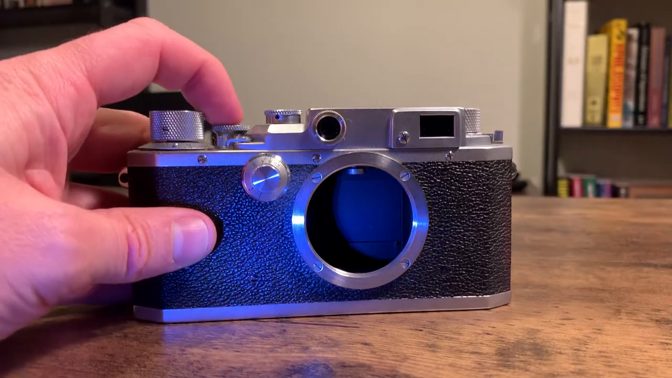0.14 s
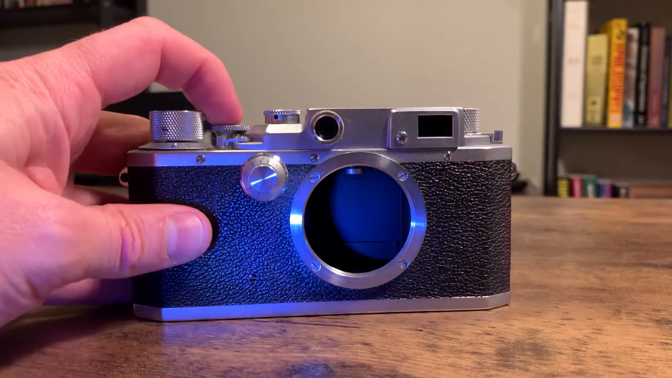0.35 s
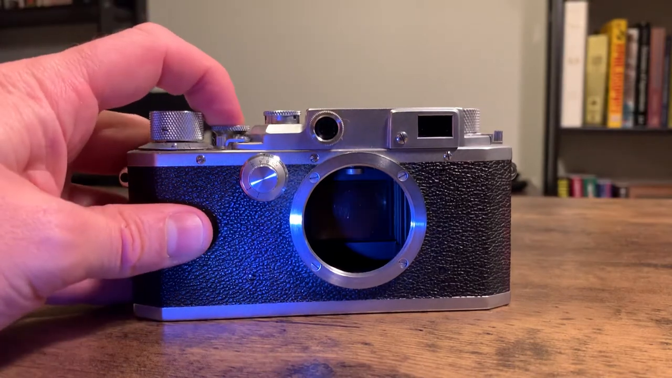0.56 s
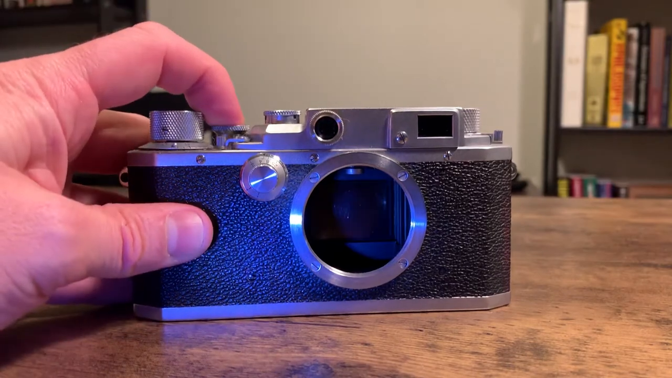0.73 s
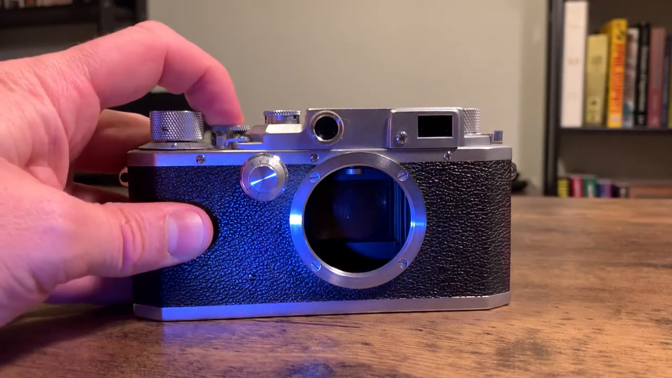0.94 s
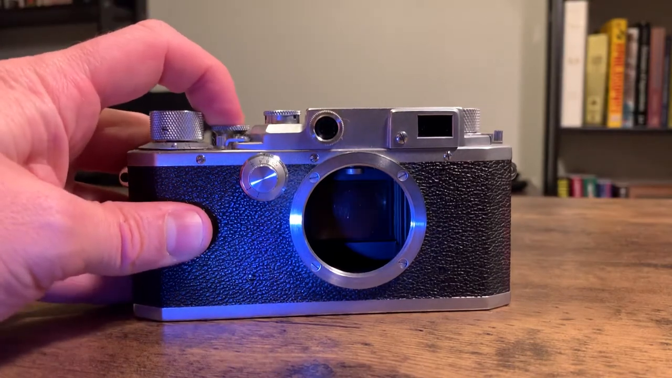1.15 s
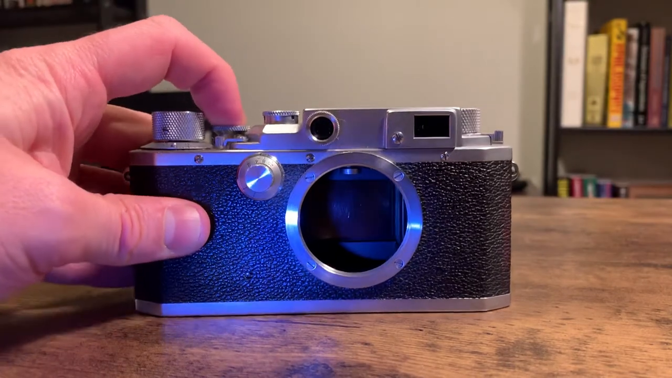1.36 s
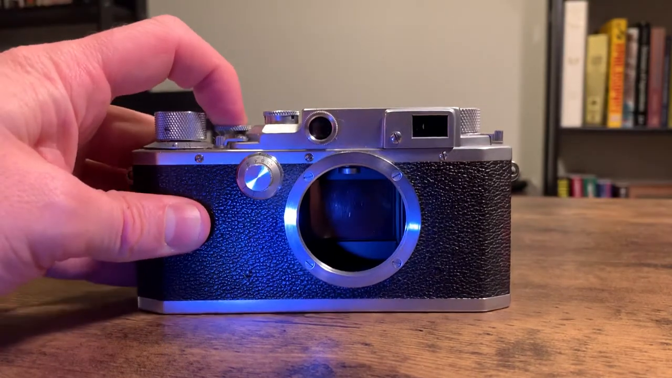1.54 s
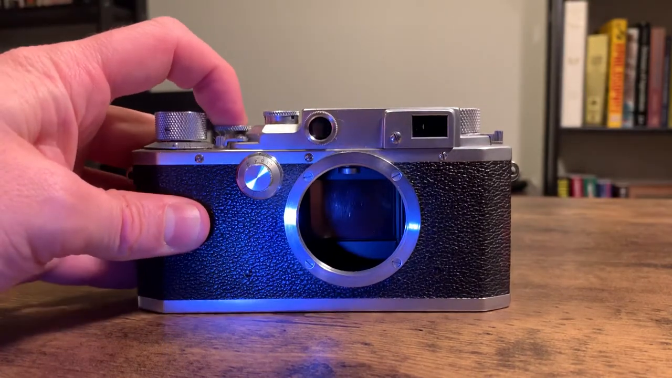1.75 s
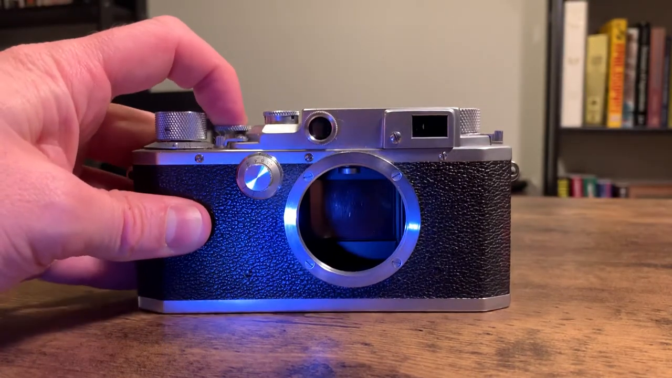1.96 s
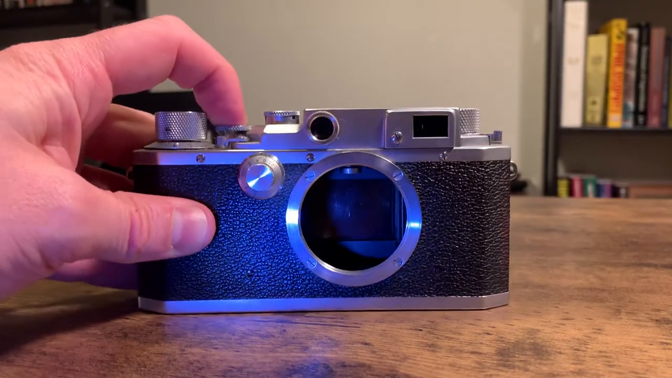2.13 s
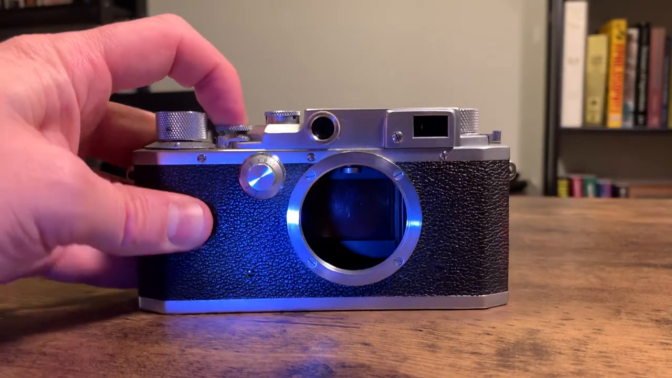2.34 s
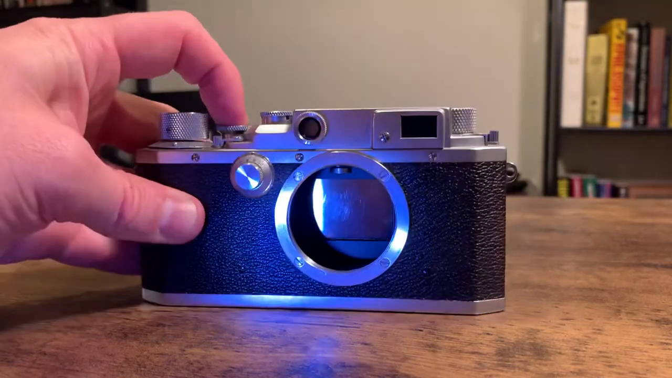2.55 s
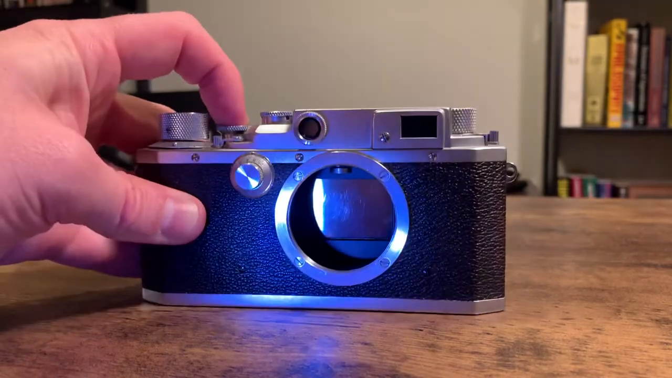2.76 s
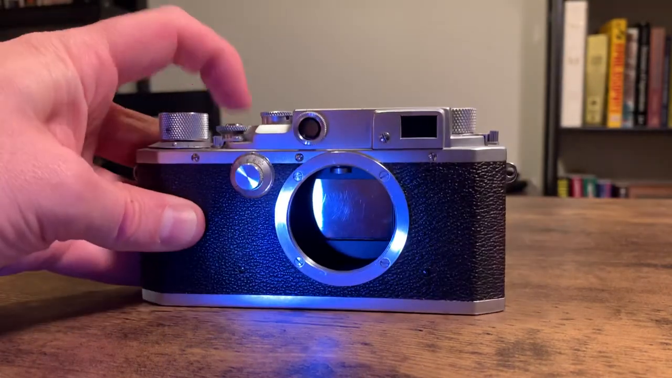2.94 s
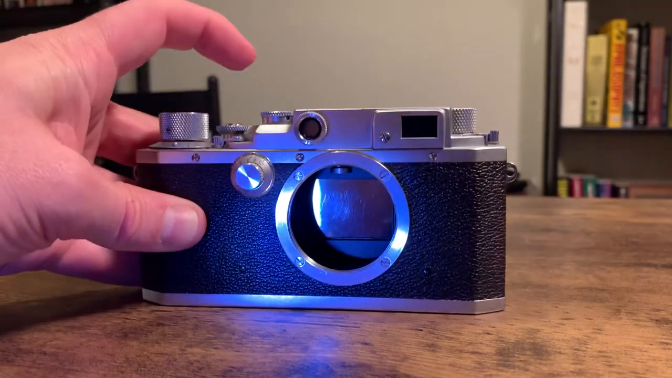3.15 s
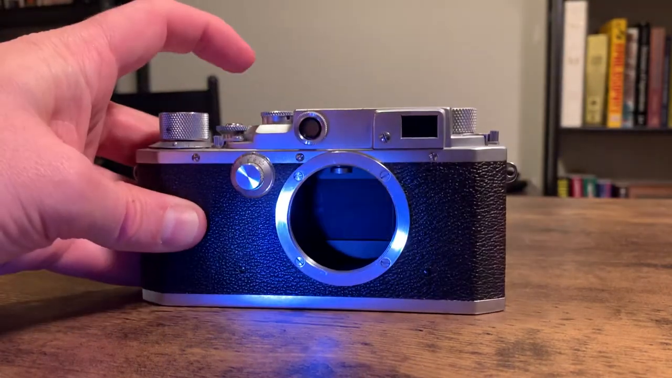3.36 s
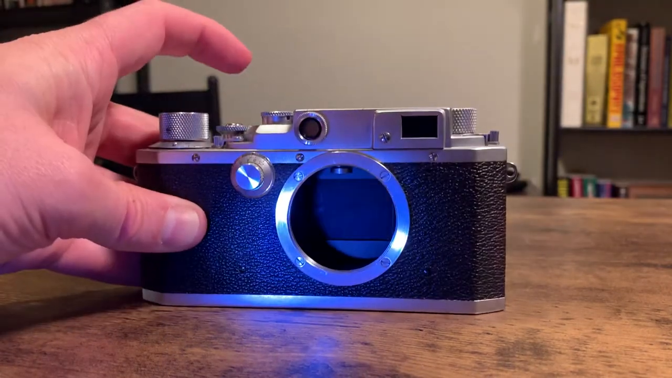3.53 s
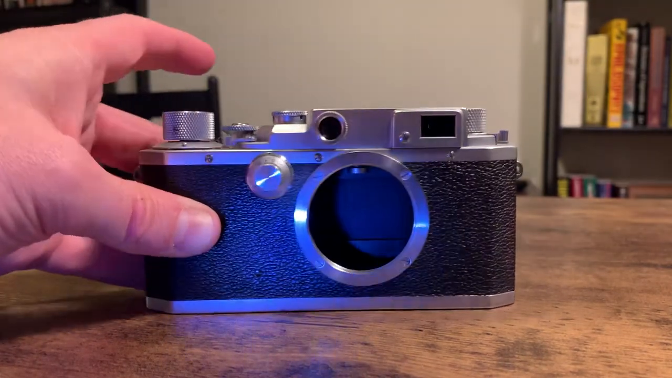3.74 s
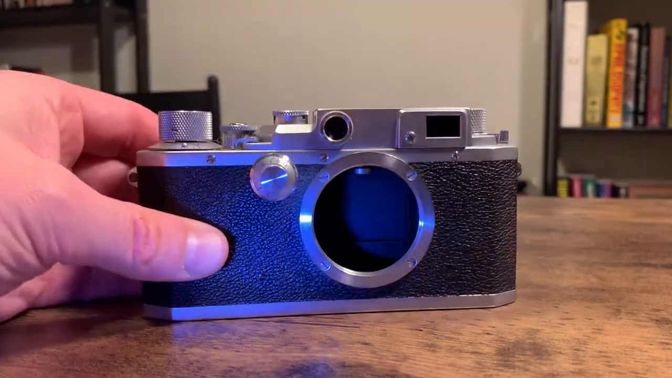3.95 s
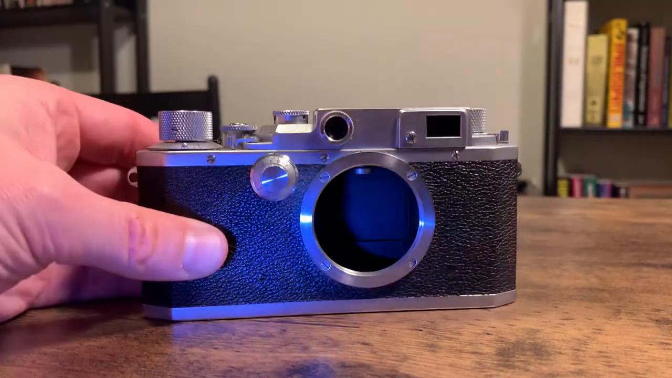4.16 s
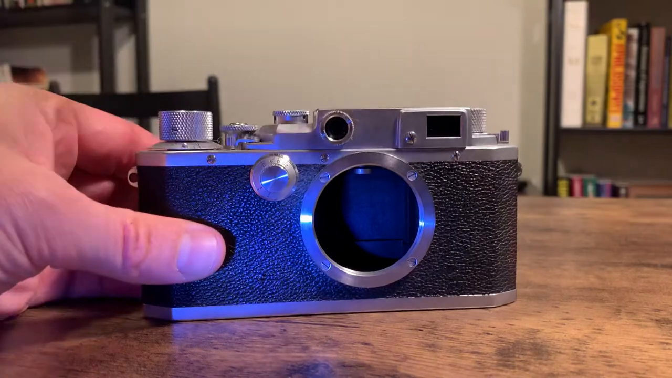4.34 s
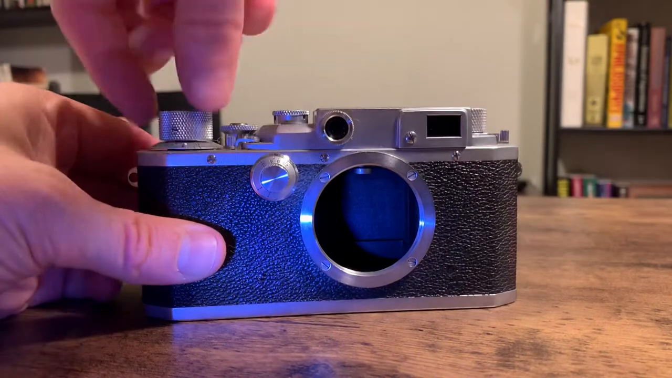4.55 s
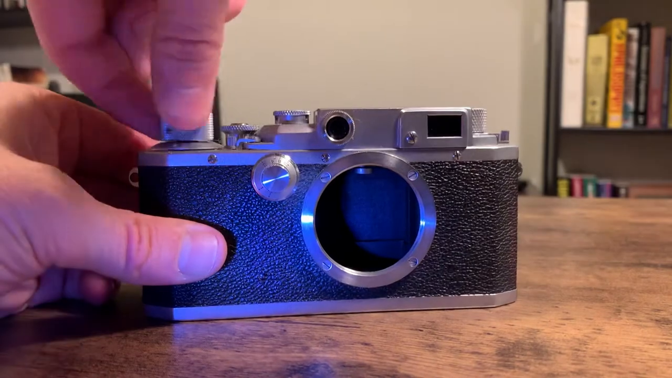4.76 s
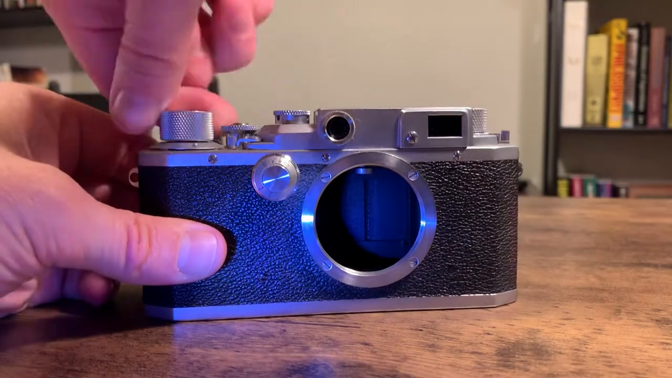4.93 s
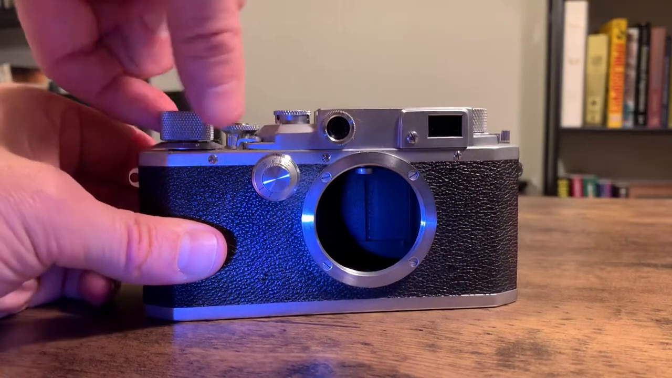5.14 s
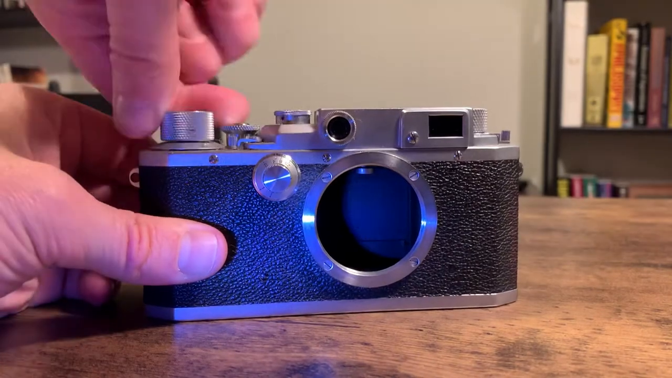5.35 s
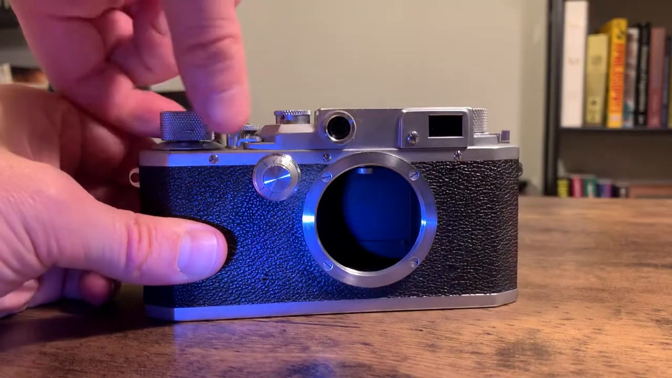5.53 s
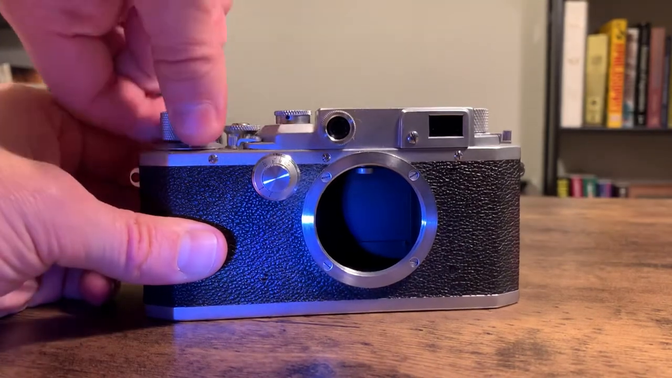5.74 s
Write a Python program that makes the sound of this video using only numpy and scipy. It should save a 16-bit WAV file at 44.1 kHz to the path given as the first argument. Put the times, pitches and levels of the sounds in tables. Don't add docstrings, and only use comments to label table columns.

```python
import sys
import numpy as np
from scipy import signal
from scipy.fft import rfft, irfft, next_fast_len
from scipy.io import wavfile
from scipy.ndimage import map_coordinates

SR = 44100
rng = np.random.default_rng(int(sys.argv[2]) if len(sys.argv) > 2 else 0)


def boost(x):
    u = np.asarray(x, float) / 20
    return 10 ** u


def bounce(signal):
    frames = np.transpose(np.atleast_2d(signal))
    limited = np.clip(frames, -1, 1)
    pcm = np.round(limited * 32767).astype(np.int16)
    wavfile.write(sys.argv[1], SR, pcm)


N = 255515
SPAN = 6144

# f/Hz, level/dB
AIR_SPECTRUM = [(20, -32), (33, -14), (50, -11.5), (85, -2.5), (130, -8.5), (260, -2), (500, -11.5),
                (900, -19), (1500, -23), (1900, -29.5), (2800, -47.5), (4200, -45.5), (8000, -48.5),
                (16000, -53)]
# f/Hz, width/Hz, level/dB
FAN_TONES = [(315, 31, -10.5), (380, 15, -8.5), (414.8, 15, -12.5), (516.7, 5, -14), (540, 15, -6),
             (1500, 36, -18.5), (2340, 90, -29), (2800, 90, -30), (3420, 65, -34.5), (15000, 100, -46.5)]
# f/Hz, level/dB, unsteadiness/dB, left leads by/radians, left minus right/dB
MOTOR_TONES = [(57.7, -52, 2, 0.74, -2), (167, -63.5, 4.5, 0.092, 1.5), (259.7, -58.5, 4.5, 0.71, -0.13)]
# f/Hz, width/Hz, level/dB
SHELL = [(1255, 410, -0.5), (3100, 870, -4), (4740, 330, -3), (6010, 400, -1.5), (7020, 770, -3.5),
         (8500, 1200, -4), (10400, 370, -1), (11860, 320, -1.5), (11900, 980, 1.5), (12400, 1100, -5.5),
         (13600, 690, -6.5), (15760, 600, 0)]
# f/Hz, level/dB, time to fall 60 dB/s
BODY_ON_WOOD = [(312, -4, 0.21), (480, -9.5, 0.039), (700, -8, .04), (1083, -6.5, 0.18),
                (1345, -11.5, 0.008)]
# t/s, peak level/dB, brightest f/Hz, thump level/dB, thump f/Hz
CATCH = [
    (.4167, -33, 5970, -52, 1200),
    (.4408, -11.5, 4450, -29, 480),
]
OPENING = [
    (.4366, -33, 7000, -46, 330),
    (.4425, -19, 5960, -28, 290),
    (.4635, -27, 12300, -38, 315),
    (.4797, -14, 15300, -34, 1300),
    (.4849, -3, 11200, -21, 1120),
    (.4872, -11, 5950, -17, 480),
    (.4975, -28, 12500, -25, 312),
]
# t/s, level/dB, body drone against it/dB
CURTAIN_RUNS = [
    [(.446, -43, 6), (.462, -42, 5), (.472, -35, -1), (.484, -32, -1)],
    [(.49, -32, 6), (.499, -41, 13), (.512, -52, 17)],
    [(3.158, -42, -6), (3.171, -44, -4), (3.177, -31, -12), (3.187, -25, -13), (3.202, -26, -10)],
]
# t of most force/s, rise/s, fall/s, level/dB, grit against it/dB
SHOVES = [(1.25, 0.15, 0.19, -48, -27), (2.116, 0.12, 0.043, -57.5, -8.5), (2.34, 0.16, 0.13, -43.5, -19),
          (3.615, .13, 0.2, -41.5, -20.5), (3.845, 0.052, 0.11, -42.5, -27),
          (4.775, 0.098, 0.16, -45.5, -11), (4.915, 0.035, 0.15, -50.5, -14.5),
          (5.19, 0.081, 0.13, -50, -9.5), (5.26, 0.088, 0.114, -45.5, -16),
          (5.364, 0.012, 0.043, -52.5, -17), (5.79, 0.015, .05, -43, -35)]
# f/Hz, level/dB
DRAG_SPECTRUM = [(80, 4.5), (200, -2), (420, 6.5), (650, 0), (1100, -10.5), (1700, -25.5), (3000, -46)]
# f/Hz, width/Hz, level/dB
TABLE_TOP = [(280.8, 30, -5.5), (479, 38, 5), (854, 18, -22), (1100, 57, -35), (1880, 30, -19)]
# f/Hz, level/dB
GRIT_SPECTRUM = [(1200, 5), (2200, 1.5), (4500, -15), (6700, -20.5), (11000, -25.5), (16000, -30.5)]
# t of most force/s, rise/s, fall/s, level/dB, hiss against it/dB
RUBS = [
    (2.1, 0.048, 0.047, -75, 10),
    (4.19, 0.25, 0.23, -67.5, -5.5),
    (4.3, 0.086, 0.18, -57.5, -22),
    (4.48, 0.12, 0.44, -66, -0.5),
    (4.785, 0.089, 0.11, -62.5, 5.5),
    (5.03, 0.22, 0.37, -64, -1.5),
    (5.23, .12, 0.094, -83, -5),
    (5.59, 0.071, 0.04, -65.5, 6.5),
]
# f/Hz, level/dB
SKIN_SPECTRUM = [(1500, 18), (2800, 14), (3300, 19.5), (3750, 19.5), (4300, 13), (4900, -23), (5300, -64),
                 (5900, -23), (6500, -36)]
# f/Hz, level/dB
HISS_SPECTRUM = [(4000, -5.5), (6500, -18.5), (10000, -15), (15000, -38), (16500, -21)]
# t/s, thump level/dB, thump f/Hz
KNOCKS = [
    (1.204, -45, 440),
    (2.253, -37.5, 920),
    (2.856, -32, 152),
    (3.579, -40, 500),
    (4.142, -34.5, 126),
    (4.902, -21, 1770),
    (4.907, -24.5, 1160),
    (5.365, -45, 500),
]
# t/s, peak level/dB, brightest f/Hz, thump level/dB, thump f/Hz
TICKS = [(1.928, -57.5, 4360, -34, 1750), (2.088, -46.5, 8600, -33, 1100), (2.094, -44, 15000, -67, 1200),
         (2.113, -45, 9730, -59, 540), (2.120, -51, 6600, -41, 1100), (4.140, -59, 10850, -52, 900),
         (4.487, -40.5, 3760, -47, 1880), (4.490, -38, 2010, -31, 465), (4.646, -40, 11900, -33, 475),
         (4.663, -39, 4120, -32.5, 444), (4.688, -38, 12530, -38, 1500), (4.763, -27, 3610, -46.5, 1900),
         (4.771, -30.5, 5770, -28, 430), (5.258, -48, 4380, -55, 436), (5.5675, -26, 14200, -30, 700),
         (5.5705, -26.5, 4900, -24.5, 480), (5.577, -43, 3000, -30.5, 257)]
# t/s, peak level/dB
SNAPS = [
    (4.2436, -42.5),
    (4.2720, -41),
    (4.3860, -47),
]
# t/s, peak level/dB, brightest f/Hz, thump level/dB, thump f/Hz
CLOSING = [
    (2.8105, -38, 5960, -50, 390),
    (2.8180, -40, 10500, -42, 900),
    (2.8225, -28, 12000, -46, 600),
    (2.8238, -16, 12000, -38, 700),
    (2.8275, -20, 9900, -32, 500),
    (2.8322, -26, 6000, -36, 400),
    (2.8400, -27, 6000, -36, 260),
    (2.8550, -36, 10300, -33, 280),
    (3.1620, -26, 10400, -44, 700),
    (3.1845, -19, 10300, -36, 650),
]
# t/s, teeth passed so far
TEETH = [
    (2.8312, 0),
    (2.849, 3),
    (2.9181, 14),
    (2.9882, 24),
    (3.0405, 32),
    (3.107, 44),
    (3.1631, 54),
]
# t/s, level/dB
GEAR_LEVEL = [
    (2.845, -48.5),
    (2.939, -50.5),
    (3.111, -48.5),
    (3.119, -51),
    (3.16, -41.5),
]
# t/s, peak level/dB, brightest f/Hz, thump level/dB, thump f/Hz
BRAKE = [
    (3.2027, -3.5, 14400, -21, 650),
    (3.2042, -11, 12400, -11, 560),
]
# t/s, f/Hz, level/dB
SQUEAK = [
    (4.879, 5500, -85.5),
    (5.0, 5650, -82),
    (5.151, 5850, -78),
    (5.219, 5950, -63.5),
    (5.3, 6100, -101),
]
# f/Hz, time to fall 60 dB/s
ECHO = [(200, 0.46), (1000, .33), (4000, .46), (10000, 0.24), (16000, 0.11)]
# f/Hz, likeness 0 to 1
NEAR_LIKENESS = [(60, .8), (500, .6), (1200, .45), (2500, .6), (5000, .6), (7500, .96), (15000, .98)]
# f/Hz, likeness 0 to 1
FAR_LIKENESS = [(60, .75), (300, .5), (1000, .2), (4000, .25), (7500, .94), (15000, .96)]
# f/Hz, phase/radians
LEFT_LEAD = [(0, 0), (600, 1), (1500, 1.6), (2400, 3), (4200, 0), (6300, 0), (8600, np.pi),
             (10900, 2 * np.pi), (13400, 3 * np.pi), (15700, 4 * np.pi), (17000, 4.5 * np.pi)]
# f/Hz, left minus right/dB
BALANCE = [(60, -2), (200, -1.5), (380, 1), (700, 0.5), (1290, 0), (2380, -0.5), (8120, -2), (15000, 1)]
# f/Hz, level/dB
MIC_RESPONSE = [(100, 0), (15500, 0), (16000, -20), (16800, -45)]


def unit(x):
    return x / np.sqrt(np.mean(x ** 2) + 1e-20)


def along(points, hz):
    f, v = np.transpose(points)
    return np.interp(np.log(hz + 1), np.log(f + 1), v)


def levels(tables, edge):
    t, total = np.arange(N) / SR, 0
    for rows in tables:
        s, *columns = np.transpose(rows)
        gate = np.clip(np.minimum(t - s[0], s[-1] - t) / edge + 0.5, 0, 1)
        total = total + gate * boost([np.interp(t, s, column) for column in columns])
    return total


def wobble(rate):
    knots = rng.standard_normal(int(N * rate / SR) + 4)
    return map_coordinates(knots, [np.arange(N) * rate / SR])


def hiss():
    return rng.standard_normal((2, N))


def filtered(x, response):
    m = next_fast_len(x.shape[-1] + SPAN)
    return irfft(rfft(x, m) * response(np.fft.rfftfreq(m, 1 / SR)), m)[..., :x.shape[-1]]


def noise(spectrum):
    return unit(filtered(hiss(), lambda hz: boost(along(spectrum, hz))))


def resonances(modes):
    def response(f):
        total = 0
        for k, (centre, width, db) in enumerate(modes):
            damping = 1j * f * width
            total = total + (-1) ** k * boost(db) * damping / (centre ** 2 - f ** 2 + damping)
        return total
    return response


def air():
    def narrow(hz):
        return sum(boost(db) / (1 + ((hz - centre) / width) ** 2) for centre, width, db in FAN_TONES)
    fan = unit(filtered(hiss(), narrow))
    return boost(-56 + 0.8 * wobble(3)) * noise(AIR_SPECTRUM) + boost(-62 + 1.7 * wobble(7.3)) * fan


def hum():
    t, side, total = np.arange(N) / SR, np.array([[0.5], [-0.5]]), 0
    for hz, db, sway_db, lead, balance_db in MOTOR_TONES:
        loudness = np.sqrt(2) * boost(db + sway_db * wobble(22) + side * balance_db)
        drift = (0.26 + 0.17 * sway_db) * wobble(8)
        total = total + loudness * np.sin(2 * np.pi * hz * t + drift + side * lead)
    return total


def contacts(rows, t60, wood_db, focus_db, wide, cycles, reach):
    out, t = np.zeros((2, N + SPAN)), np.arange(SPAN) / SR
    f = np.fft.rfftfreq(SPAN, 1 / SR)
    shell = resonances(SHELL)(f)
    for s, db, hz, thump_db, thump_hz in rows:
        rattle = rng.standard_normal((2, SPAN)) * boost(-60 * t / t60) * (1 - np.exp(-t / 0.0003))
        dull = 1 / (1 + 1j * f / (reach * hz)) ** 2
        own_pitch = boost(focus_db) * resonances([(hz, wide * hz, 0)])(f) ** 2
        ring = irfft(rfft(rattle) * (dull * shell + own_pitch), SPAN)
        thump = boost(-60 * t * thump_hz / cycles) * np.sin(2 * np.pi * thump_hz * t)
        for tone_hz, tone_db, life in BODY_ON_WOOD:
            luck_db = rng.normal(0, 2, (2, 1))
            fall = boost(wood_db + tone_db + luck_db - 60 * t / life)
            thump = thump + fall * np.sin(2 * np.pi * tone_hz * t)
        thump = thump * (1 - np.exp(-t / 0.00063)) * (1 - t / t[-1])
        start = round(s * SR)
        out[:, start:start + SPAN] += boost(db) * ring / abs(ring[0]).max() + boost(thump_db) * thump
    return out[:, :N]


def shutter():
    steel = dict(cycles=11, reach=9)
    first = contacts(OPENING, t60=0.012, wood_db=-8, focus_db=3, wide=0.08, **steel)
    second = contacts(CLOSING, t60=0.0135, wood_db=-20, focus_db=3, wide=0.14, **steel)
    catch = contacts(CATCH, t60=0.007, wood_db=-12, focus_db=13, wide=0.07, **steel)
    brake = contacts(BRAKE, t60=0.01, wood_db=-22, focus_db=13, wide=0.13, **steel)
    return first + second + catch + brake + escapement() + curtains()


def curtains():
    gain, drone_gain = levels(CURTAIN_RUNS, edge=0.002)

    def thin(hz):
        return resonances(SHELL)(hz) * boost(along([(1300, -9.5), (4000, -3.5)], hz))
    rush = unit(filtered(hiss() * boost(1.5 * wobble(700)), thin))
    body = resonances([(hz, 5 / t60, db) for hz, db, t60 in BODY_ON_WOOD])
    drone = unit(filtered(hiss(), body))
    return gain * rush + gain * drone_gain * drone


def strokes(rows):
    fade_db, roundness = 39.5, 1.59
    t, total = np.arange(0, N / SR + 0.002, 0.001), 0
    for s, rise, fall, db, second_db in rows:
        away = np.maximum((s - t) / abs(rise), (t - s) / abs(fall))
        total = total + boost(db - fade_db * away ** roundness) * boost([[0], [second_db]])
    return [np.interp(np.arange(N) / SR, t, gain) for gain in total]


def hands():
    base_gain, grit_gain = strokes(SHOVES)
    skin_gain, hiss_gain = strokes(RUBS)

    def wood(hz):
        return boost(along(DRAG_SPECTRUM, hz)) * (boost(-6.5) + resonances(TABLE_TOP)(hz))
    boom = base_gain * boost(1.5) * unit(filtered(hiss(), wood))
    grit = grit_gain * boost(7 + 1.1 * wobble(300)) * noise(GRIT_SPECTRUM)
    drag = boost(2.6 * wobble(45)) * (boom + grit)
    skin = skin_gain * boost(2.8 * wobble(150)) * noise(SKIN_SPECTRUM)
    return drag + skin + hiss_gain * noise(HISS_SPECTRUM)


def fingers():
    knocks = [(s, db - 35.5, 3940, db, hz) for s, db, hz in KNOCKS]
    slips = SNAPS + [(4.279 + 0.0072 * k, -49.5) for k in range(10)]
    snaps = []
    for s, db in slips:
        pitch_luck, time_luck, level_luck = rng.standard_normal(3)
        hz = 3950 * (1 + 0.037 * pitch_luck)
        snaps.append((s + 0.00044 * time_luck, db + 2.5 * level_luck, hz, db - 17, 1900))
    return (contacts(knocks, t60=0.021, wood_db=-21, focus_db=-6, wide=0.21, cycles=7, reach=2)
            + contacts(TICKS, t60=0.022, wood_db=-18, focus_db=4, wide=0.21, cycles=6, reach=2.66)
            + contacts(snaps, t60=0.011, wood_db=-20, focus_db=32, wide=0.25, cycles=8, reach=0.5))


def escapement():
    s, teeth = np.transpose(TEETH)
    count = int(teeth[-1])
    time_luck, level_luck = rng.standard_normal((2, count))
    times = np.interp(np.arange(count), teeth, s) + 0.0004 * time_luck - 0.001
    strikes = np.zeros(N)
    strikes[np.round(times * SR).astype(int)] = boost(1.8 * level_luck)
    t = np.arange(SR // 50) / SR
    decay = boost(-60 * t / 0.012) * (1 - np.exp(-t / 0.0005))
    beat = signal.fftconvolve(strikes, decay)[:N] + boost(-24)

    def small_parts(hz):
        tone = [(2600, -30.5), (5000, 1.5), (7000, 3), (10000, 6.5)]
        return resonances(SHELL)(hz) * boost(along(tone, hz))
    buzz = filtered(beat * hiss(), small_parts)
    gain = levels([GEAR_LEVEL], edge=0.004)
    buzz = buzz / np.sqrt(np.mean(buzz[:, gain[0] > 0] ** 2))
    whirr = noise([(600, -54), (1050, -3.5), (1500, -0.5), (2100, -5), (2650, -9.5), (3300, -8),
                   (6000, -3), (7500, -20.5)])
    return gain * (boost(6) * buzz + boost(-4.5) * whirr)


def squeak():
    s, hz, db = np.transpose(SQUEAK)
    t = np.arange(N) / SR
    phase = 2 * np.pi * np.cumsum(np.interp(t, s, hz) + 170 * wobble(450)) / SR
    level_db = np.interp(t, s, db, left=-150, right=-150) + 1.4 * wobble(80)
    return boost(level_db) * np.sin(phase) * [[1], [0.6]]


def room(x):
    hz, t, z = signal.stft(rng.standard_normal((2, SR // 2)), SR, nperseg=256)
    dying = z * boost(-60 * t / along(ECHO, hz)[:, None])
    tail = signal.istft(dying, SR, nperseg=256)[1]
    late = np.pad(x, ((0, 0), (220, 0)))
    return signal.fftconvolve(late, tail / np.linalg.norm(tail[0]), axes=1)[:, :N]


def ports(pair, likeness):
    def share(hz):
        angle = np.arccos(np.clip(along(likeness, hz), -1, 1)) / 2
        return np.array([np.cos(angle), np.sin(angle)])

    def skew(hz):
        left = np.exp(0.5j * np.interp(hz, *np.transpose(LEFT_LEAD))) * boost(along(BALANCE, hz) / 2)
        return np.array([left, 1 / left])
    mid, side = filtered(pair, share)
    return filtered(np.array([mid + side, mid - side]), skew)


def scene():
    camera = shutter() + fingers()
    touch = hands() + squeak()
    echo = boost(-17) * room(camera + boost(8) * touch)
    return ports(camera + touch, NEAR_LIKENESS) + ports(echo + air(), FAR_LIKENESS) + hum()


def top_cut(x):
    return signal.sosfilt(signal.butter(12, 16970, fs=SR, output="sos"), x)


def record(dry):
    mix = filtered(dry, lambda hz: boost(along(MIC_RESPONSE, hz)))
    return top_cut(mix)


dry = scene()
out = record(dry)
bounce(out)
```